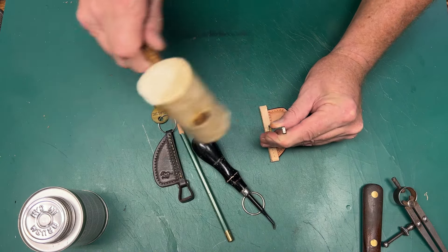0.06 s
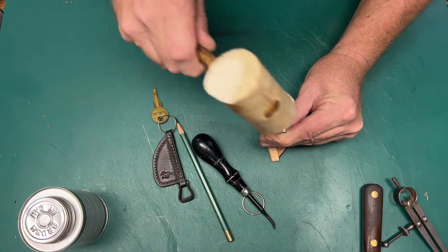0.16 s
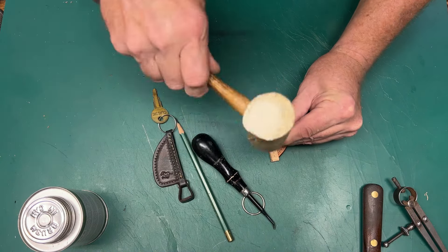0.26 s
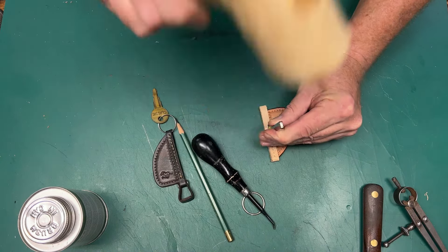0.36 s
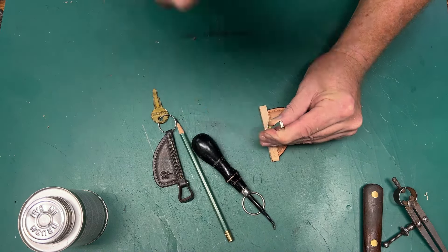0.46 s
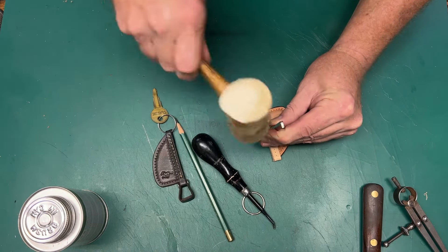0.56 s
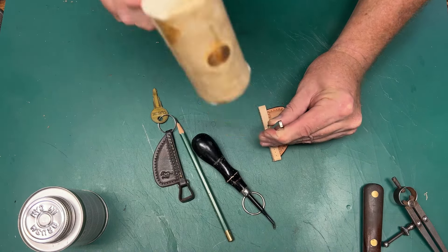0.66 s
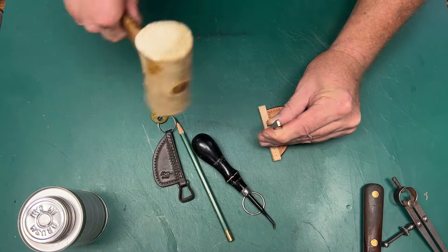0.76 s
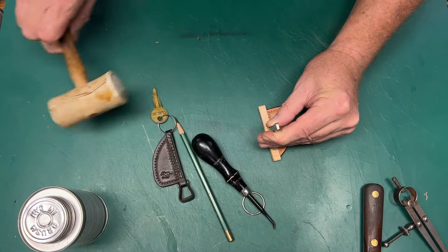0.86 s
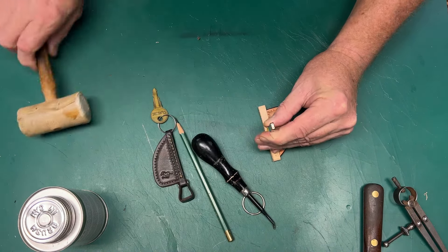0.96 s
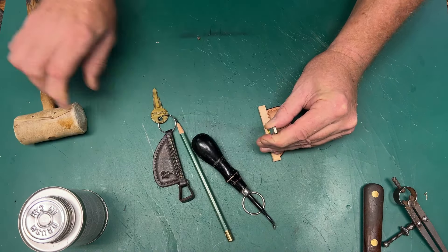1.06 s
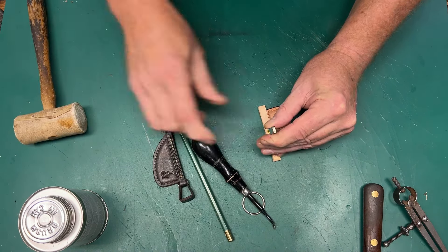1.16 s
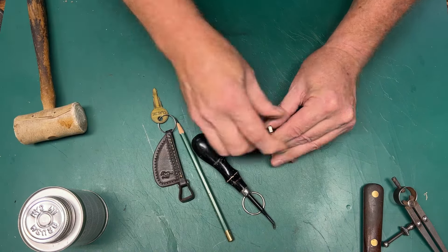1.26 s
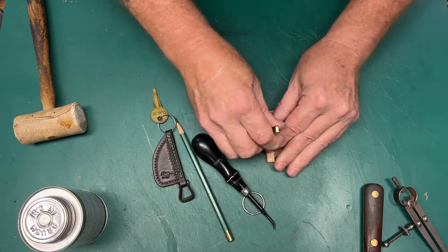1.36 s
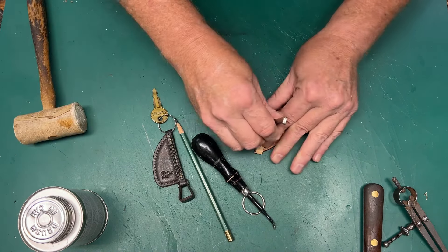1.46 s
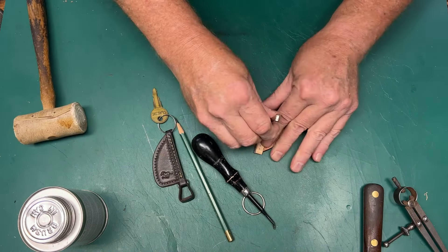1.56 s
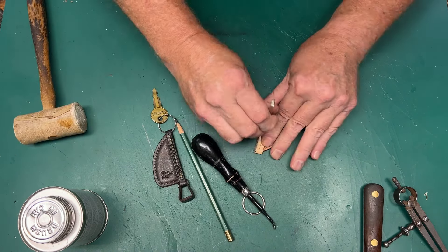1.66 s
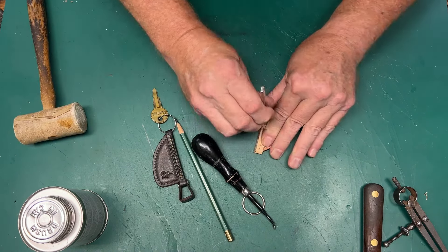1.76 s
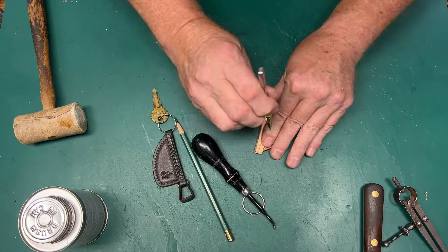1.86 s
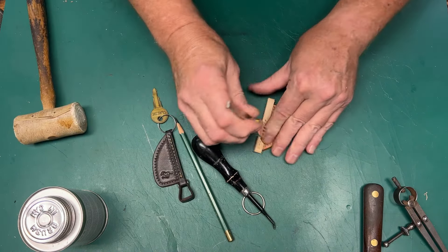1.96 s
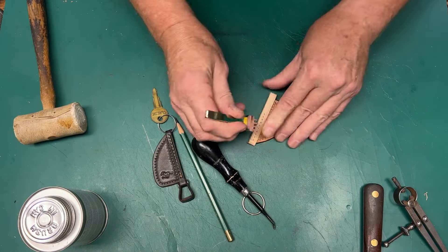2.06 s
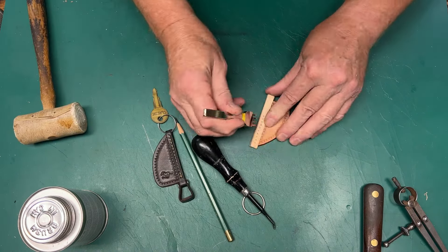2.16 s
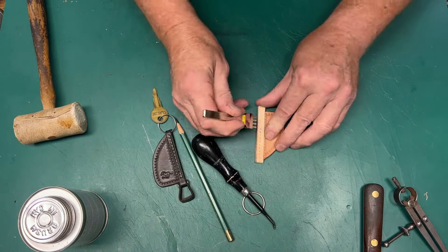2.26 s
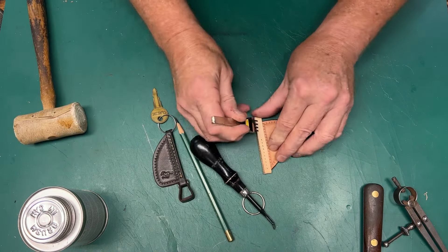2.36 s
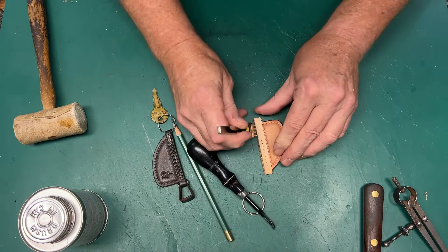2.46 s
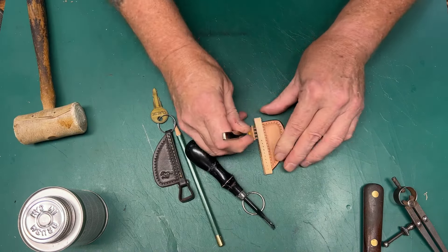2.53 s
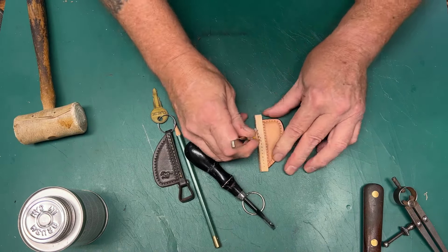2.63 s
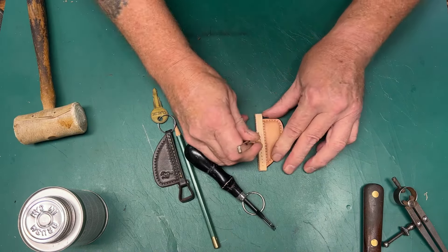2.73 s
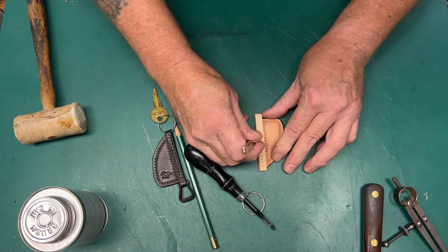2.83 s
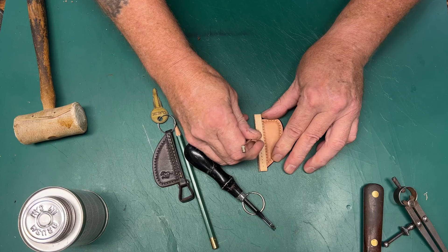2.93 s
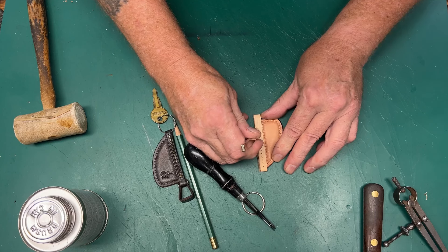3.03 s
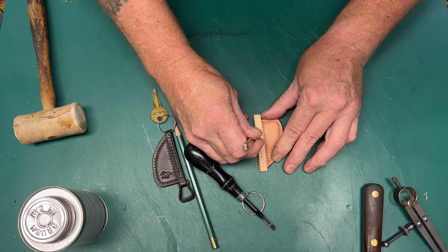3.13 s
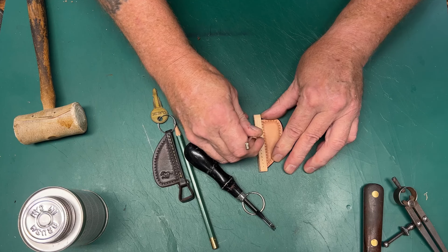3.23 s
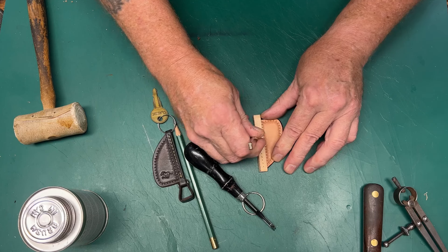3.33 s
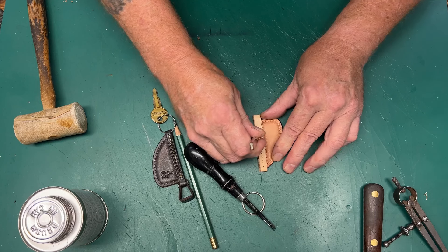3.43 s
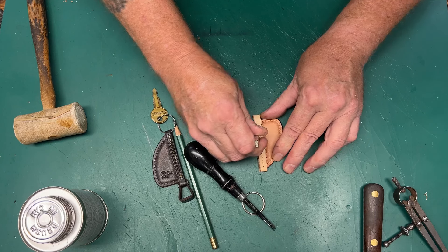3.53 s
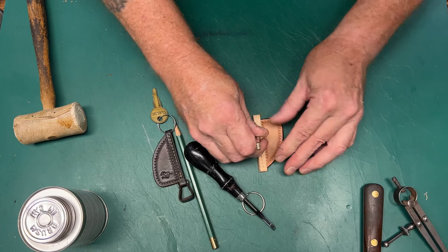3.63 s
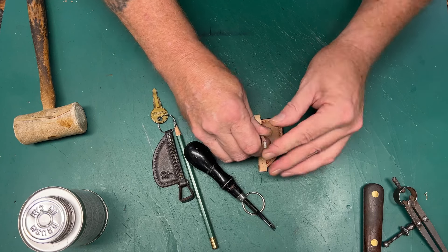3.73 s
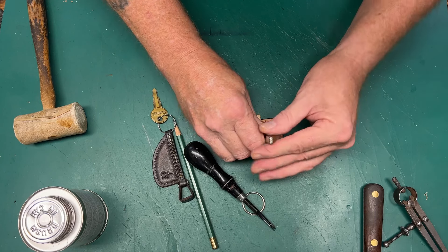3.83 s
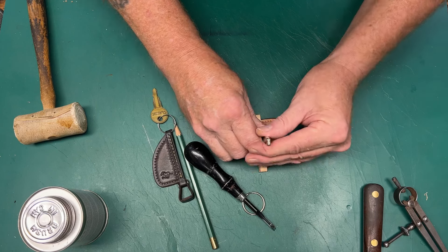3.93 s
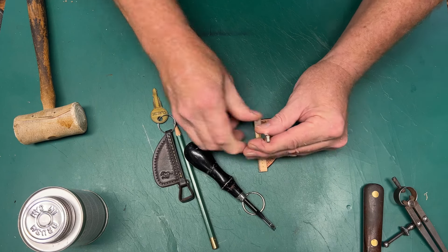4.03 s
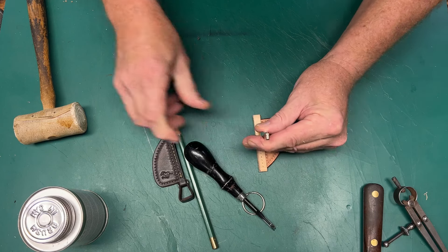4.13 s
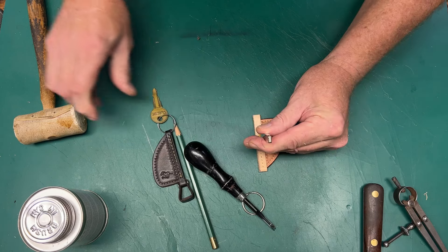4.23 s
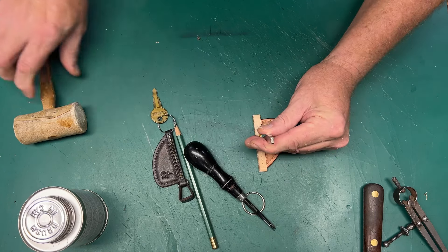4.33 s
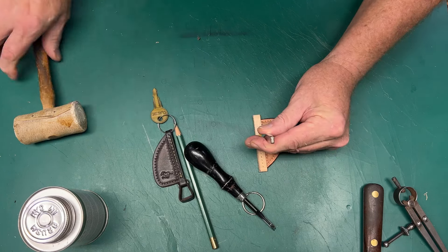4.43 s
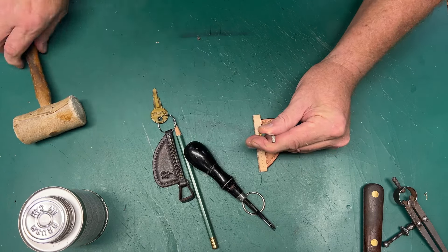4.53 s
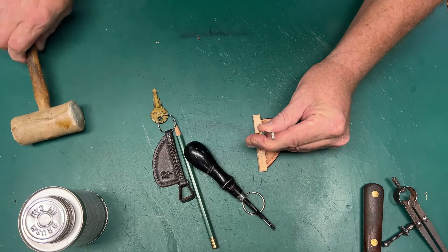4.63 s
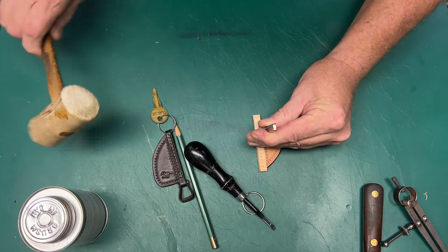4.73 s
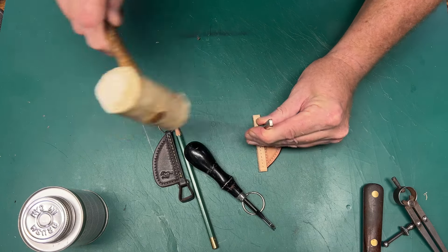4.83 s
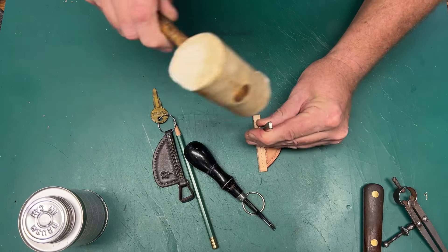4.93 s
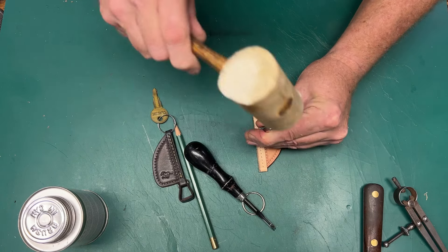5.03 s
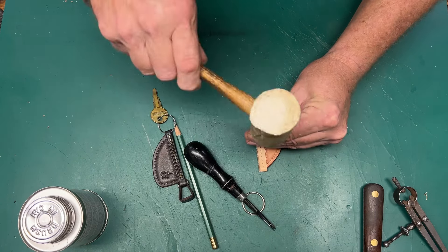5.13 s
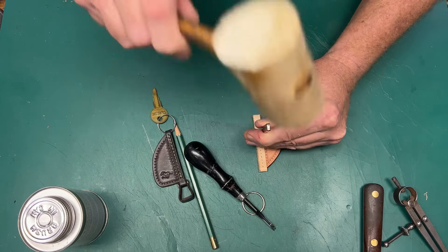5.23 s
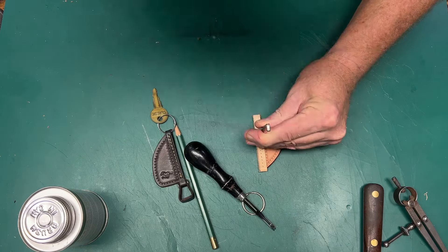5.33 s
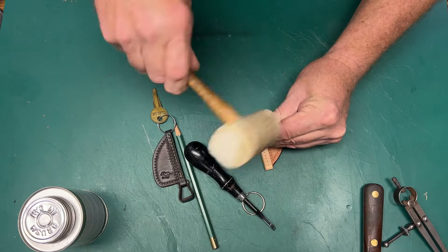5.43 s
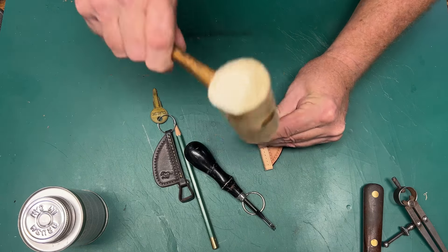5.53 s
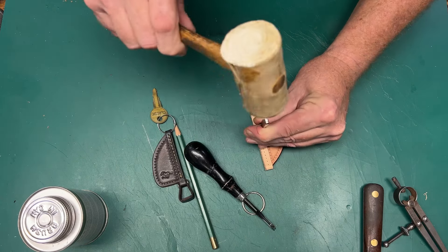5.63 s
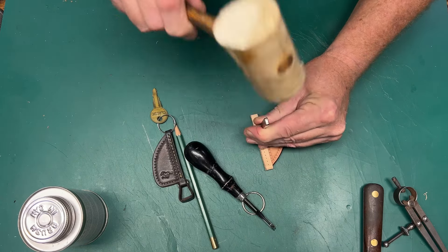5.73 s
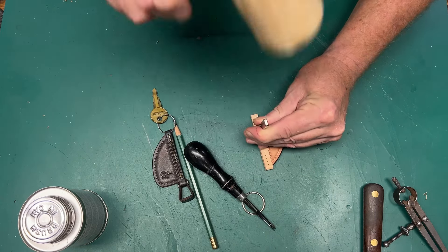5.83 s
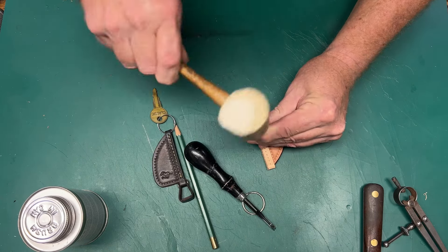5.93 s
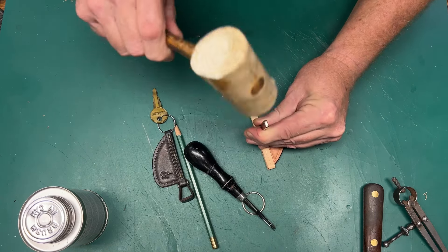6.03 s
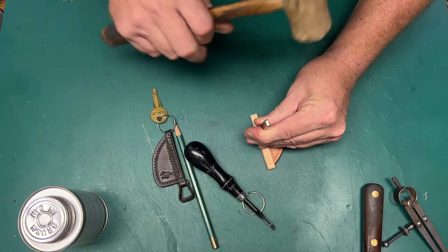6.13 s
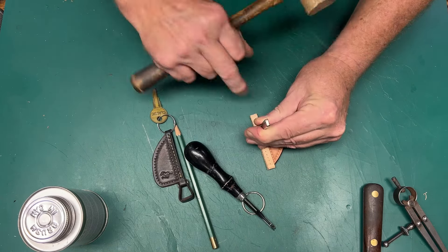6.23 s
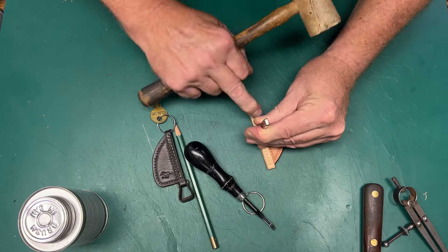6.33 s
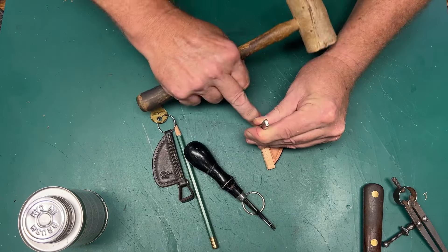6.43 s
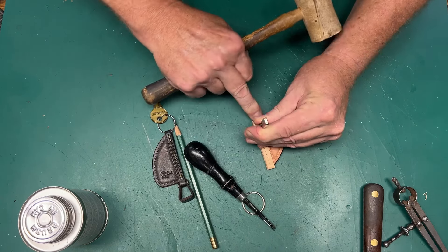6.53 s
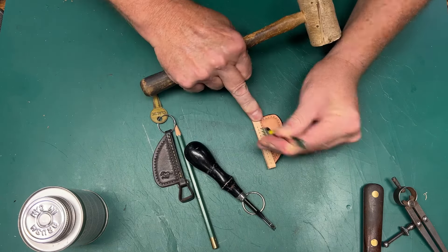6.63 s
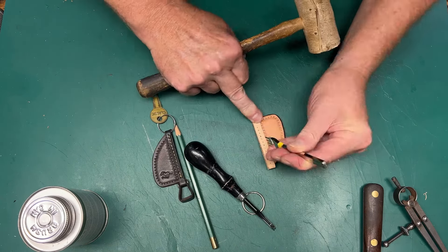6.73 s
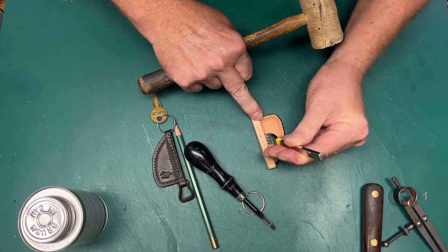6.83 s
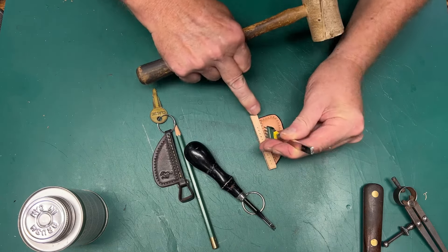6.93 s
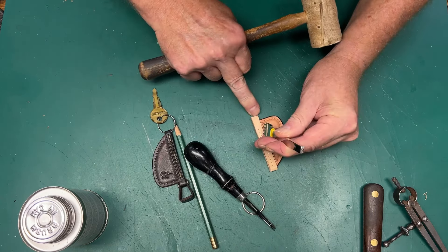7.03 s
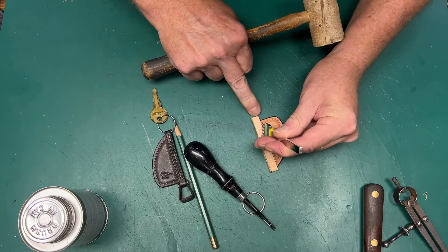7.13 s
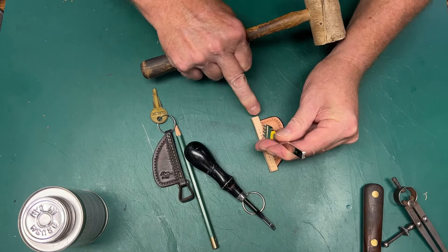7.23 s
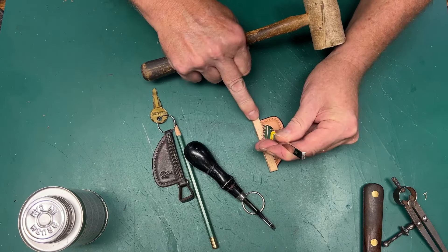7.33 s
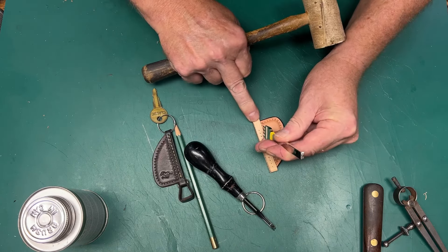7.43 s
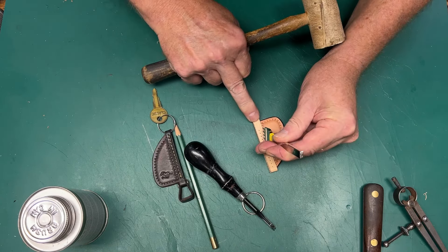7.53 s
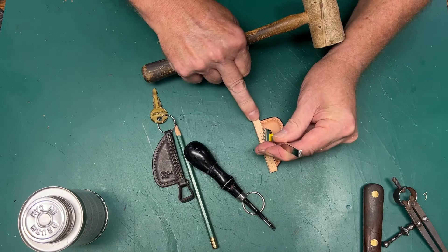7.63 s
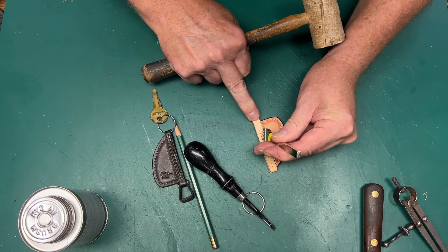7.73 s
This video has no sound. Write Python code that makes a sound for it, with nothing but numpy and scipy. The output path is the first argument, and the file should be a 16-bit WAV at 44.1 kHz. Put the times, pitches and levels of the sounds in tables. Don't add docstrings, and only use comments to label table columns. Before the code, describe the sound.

Close stereo perspective on a leatherworking bench: two woody, cracking blows with a thump of the bench top, then the mallet clatters down to the left. Quiet skin-on-leather swishes and tiny clicks fill the pause. A short scrape lifts the mallet and three blows follow, the first duller, the next two heavier. One soft hand bump and small rubs end it over faint ventilation and mains hum, with brief room reverberation.

```python
import sys
import numpy as np
from scipy import signal
from scipy.io import wavfile
from scipy.ndimage import uniform_filter1d

SR = 44100
rng = np.random.default_rng(int(sys.argv[2]) if len(sys.argv) > 2 else 0)


def linear_from_db(decibels):
    return 10 ** (np.asarray(decibels, float) / 20)


def bounce(signal):
    frames = np.transpose(np.atleast_2d(signal))
    limited = np.clip(frames, -1, 1)
    pcm = np.round(limited * 32767).astype(np.int16)
    wavfile.write(sys.argv[1], SR, pcm)


N = 343098

# frequency in Hz, level in dB per Hz.
AIR_SPECTRUM = [(15, -50), (30, -23), (50, -10), (90, -10.5), (150, -17), (240, -22.5), (360, -20.5),
                (600, -28), (1200, -36.5), (2500, -47), (4000, -58), (9000, -57.5), (17000, -68)]
# frequency in Hz, level in dB.
HUM_TONES = [(120, -59), (117.52, -65), (71.5, -66), (86, -72), (176.3, -74), (178.1, -74), (240, -76)]
# time in seconds, gain in dB.
SLOW_GAIN = [(0, 1.5), (1.001, 5), (1.5, 3.5), (4.997, 3.5), (6.298, 1.5), (7.78, 0.5)]
AIR_DB = -61.5
HUM_TOGETHER_S = 8
SHAFT_HZ, BEAT_S, LOUDEST_S = 58.12, 1.64, 3.43
SHAFT_DB, NEIGHBOUR_DB = -69.5, -65

# frequency in Hz, T60 in seconds.
ROOM_T60 = [(60, 0.21), (160, 0.64), (420, 0.44), (1100, 0.58), (2900, 0.48), (7700, 0.45), (14000, .2)]
# frequency in Hz, level in dB relative to the direct sound.
ROOM_LEVEL = [(60, -13.5), (150, -6.5), (400, -7), (1000, -1), (2500, -4.5), (6000, -3.5), (12000, -9.5)]
# frequency in Hz, left-right likeness from 0 to 1.
LIKENESS = [(60, 0.86), (180, 0.87), (550, 0.15), (1650, 0.6), (5000, 0.19)]
HANDS_ROOM_DB = -3

# middle in seconds, length in seconds, level in dB, brightness in dB.
RUBS = [(1.332, 0.22, -70.5, -5), (1.437, 0.096, -62.5, 5), (1.572, .03, -77, .1), (1.612, 0.052, -66.5, 4),
        (1.732, 0.071, -63, -3.5), (1.905, 0.074, -67, 0), (1.979, .11, -66, 2.5), (2.067, 0.067, -71, -1),
        (2.11, 0.023, -66, 8), (2.262, 0.24, -56.5, 3), (2.54, 0.11, -73, -3.5), (2.63, 0.094, -68.5, 1.5),
        (3.586, 0.051, -64, -1.1), (4.017, 0.11, -78, 13.5), (4.26, 0.022, -66.5, 1.5),
        (4.295, .09, -78, 8), (6.42, 0.046, -71, -1), (6.52, 0.076, -71, 7), (6.614, 0.048, -52, 1.5),
        (6.641, .04, -73.5, -1.5), (6.837, .05, -71.5, -2.5), (7.025, 0.049, -84, 13),
        (7.366, 0.042, -80.5, -1), (7.672, 0.085, -86.5, -2)]
# frequency in Hz, level in dB per Hz.
SKIN_SPECTRUM = [(800, -16.5), (1800, 1), (2800, 0), (4800, -0.5), (8200, -1), (12000, -2), (15500, 2.5)]
# start in seconds, level in dB, centre in Hz, top end in dB.
TICKS = [(1.279, -52, 4220, -14), (1.502, -51.5, 2400, -5), (1.5668, -57, 6490, -7),
         (1.6016, -58, 4190, -7), (1.6147, -53, 6950, -2), (1.68, -58, 2960, -14), (1.7095, -52, 2990, -9),
         (1.7349, -45, 3030, -8), (1.8144, -52, 2460, -3), (1.8829, -52.5, 2924, -5.5),
         (2.1132, -53, 4650, -2), (2.3976, -51, 2320, -35), (2.6739, -63, 2816, -16),
         (3.318, -54, 2500, -16), (3.453, -50, 2680, -12), (3.5253, -62, 2665, -11),
         (3.5663, -55, 2800, -22), (3.5862, -41.5, 2600, -7), (4.259, -42, 6200, 3),
         (4.935, -54.5, 6480, -10), (4.9777, -57, 6530, -10), (6.3989, -68, 4640, -13),
         (6.6186, -45, 3330, -3), (6.6375, -62.5, 5400, -4), (6.7094, -59, 9000, -5),
         (7.3565, -62, 4140, -12)]
TICK_PAN_DB, TICK_SCATTER_DB = 2, 2.5
# middle in seconds, length in seconds, level in dB.
DRAGS = [
    (0.035, 0.17, -76.5),
    (4.464, 0.11, -54.5),
    (4.517, 0.089, -63),
    (4.608, 0.063, -60),
    (4.641, 0.039, -69),
    (4.78, 0.23, -74),
]
# frequency in Hz, width in Hz, level in dB.
SCRAPE_MODES = [(3300, 300, 0.5), (4377, 500, -6), (5696, 320, 1.5)]
# frequency in Hz, level in dB per Hz.
MAT_SPECTRUM = [(400, -28), (1200, -2.5), (2200, -1), (3500, -4.5), (6000, -11.5), (9000, -25),
                (16000, -13)]
STROKE_ENDS_DB, STROKE_FLAT = -29, 2.5
# start in seconds, level in dB, contact time in
# seconds.
THUDS = [
    (1.0, -26.5, 0.002),
    (1.041, -27.5, 0.0054),
    (1.088, -35, 0.001),
    (4.461, -37.5, 0.0043),
    (4.504, -42, .005),
    (4.555, -45.5, 0.0051),
    (4.645, -44.5, 0.0059),
    (6.625, -24, .015),
]

# frequency in Hz, level in dB, T60 in seconds, side it swings first (signed),
# gain in dB once the iron is through.
BENCH_MODES = [(54, -17.5, 0.21, -1, -0.9), (67, -15, 0.24, -2, -3.4), (94, -13, .12, 1, 0.4),
               (103.6, -5, 0.3, -0.25, 0.06), (128.6, -4, 0.18, -0.73, -3.1), (230.3, -6, 0.13, 0.95, -7),
               (283, -3.5, 0.039, 1, -4.5), (333, -13, 0.3, 0.82, -1), (421, -5, .03, -1, 3),
               (490.5, -5.5, 0.05, -0.81, 3.5), (573, -6.5, 0.054, -0.48, 5.5),
               (756, -15, 0.067, 0.17, 0.8), (810, -20, 0.082, -1.1, 4), (920, -19.5, .03, 0.99, -0.35)]
# frequency in Hz, level in dB, T60 in seconds, gain in dB once the iron is through.
HEAD_MODES = [(1240, -11, 0.009, -4), (1510, -0.5, 0.025, 0.5), (1874, 0.1, 0.022, -5),
              (2270, -9, 0.031, -2.5)]
# frequency in Hz, level in dB, T60 in seconds.
HANDLE_MODES = [(3405, 0, .04), (3640, -2, .028), (4380, -6, .012), (5860, -7, .016), (8700, -12, .01)]
# frequency in Hz, level in dB per Hz.
SLAP_SPECTRUM = [(300, -29.5), (800, -5.5), (1600, 3.5), (2800, -10), (5000, -21), (9000, -32.5)]
# frequency in Hz, level in dB per Hz.
STEEL_SPECTRUM = [(1500, -19), (3000, 0), (6000, -3), (8500, -7.5), (11500, -4), (16000, -21.5)]
# frequency in Hz, level in dB per Hz.
WALLS_THROUGH = [(300, -37), (700, -5.5), (1100, 0.5), (1700, -1.5), (2800, -3), (5000, -14.5),
                 (9000, -23.5), (14000, -38)]
# frequency in Hz, level in dB per Hz.
WALLS_CUSHIONED = [(300, -29), (700, -5), (1100, -8.5), (2000, -3), (2350, -3), (2800, -17), (5000, -19.5),
                   (9000, -29), (14000, -45)]
# start in seconds, bench thump in dB, head crack in dB,
# steel tick in dB, handle ring in dB.
TAPS = [
    (2.545, -67, -64, -91.5, -97),
    (6.619, -50, -72, -80, -71),
    (6.851, -52.5, -62, -67.5, -91),
]
# start in seconds, bench thump in dB, head crack in dB,
# tick in dB, handle ring in dB.
LAID = [
    (0.93, -22, -33.5, -55, -61),
    (0.994, -24.5, -29.5, -56, -56),
    (.998, -25, -33.5, -40, -50.5),
    (1.027, -32, -33, -42, -46),
    (1.03, -22.5, -21.5, -22, -22.5),
    (1.085, -29, -38.5, -35, -35),
    (4.457, -42, -54.5, -76, -60),
    (4.553, -47.5, -60.5, -89.5, -76),
]
# start in seconds, bench thump in dB, head crack in dB, steel tick in dB,
# handle ring in dB.
BLOWS = [
    (0.225, -9.5, -16.5, -30.5, -45),
    (0.5233, -4.5, -12, -16.5, -40),
    (5.0961, -11, -15.5, -30, -34.5),
    (5.4273, -3, -14, -18, -45.5),
    (5.8938, -3.5, -12, -22, -41),
]
CUSHIONED_DB, THROUGH_DB = -10.5, -3.5
FIRMNESS = 0.37

# frequency in Hz, gain in dB.
MIC_RESPONSE = [(15, -32), (45, -5.5), (80, -1.43), (9300, -0.1), (9750, -7), (10150, -26), (10700, -5.5),
                (13000, -9.5), (13700, -25.5), (14500, -5), (16200, -5), (16800, -61.5)]


def read(points, hz):
    f, value = np.transpose(points)
    return np.interp(np.log(hz + 1), np.log(f + 1), value)


def evened(x):
    return x / np.sqrt(np.mean(x ** 2) + 1e-20)


def colour(x, points):
    log_gain = np.log(linear_from_db(read(points, abs(np.fft.fftfreq(8192, 1 / SR)))))
    taps = np.fft.ifft(np.exp(signal.hilbert(log_gain).conj())).real[:3000]
    taps = taps.reshape((1,) * (x.ndim - 1) + (-1,))
    return signal.oaconvolve(x, taps, axes=-1)[..., :x.shape[-1]]


def add(mix, s, sound, pan_db, lead=1):
    for channel, late, db in zip(mix, (0, lead), (pan_db / 2, -pan_db / 2)):
        part = channel[round(s * SR) + late:][:len(sound)]
        part += linear_from_db(db) * sound[:len(part)]


def diffuse(a, b, hz):
    same = np.clip(read(LIKENESS, hz), 0, 1)[:, None]
    return np.array([a, same * a + np.sqrt(1 - same ** 2) * b])


def workshop():
    frames, hz = N // 512 + 5, np.fft.rfftfreq(2048, 1 / SR)
    a, b, c, d, patches = rng.standard_normal((frames, len(hz), 5)).T
    patches = uniform_filter1d(uniform_filter1d(patches, 16, 0), 8, 1)
    level_db = read(AIR_SPECTRUM, hz)[:, None] + 0.4 * evened(patches)
    z = diffuse(a + 1j * b, c + 1j * d, hz) * linear_from_db(level_db)
    air = linear_from_db(AIR_DB) * evened(signal.istft(z, nperseg=2048, noverlap=1536)[1][:, :N])
    t = np.arange(N) / SR
    hum = sum(linear_from_db(db) * np.cos(2 * np.pi * f * (t - HUM_TOGETHER_S)) for f, db in HUM_TONES)
    swell = linear_from_db(SHAFT_DB) + 2 * linear_from_db(NEIGHBOUR_DB) * np.cos(2 * np.pi * (t - LOUDEST_S) / BEAT_S)
    shaft = swell * np.sin(2 * np.pi * SHAFT_HZ * t)
    return air + np.sqrt(2) * (linear_from_db(-3.5) * hum + shaft) * linear_from_db([[.5], [-.5]])


def room(x, first_s=0.0033, build_s=0.004):
    taps = np.zeros((2, SR))
    slots = np.arange(0, SR - 12, 12)
    at = slots + rng.integers(0, 12, (2, len(slots)))
    np.put_along_axis(taps, at, rng.choice([-1., 1.], at.shape), 1)
    hz, t, z = signal.stft(taps, SR, nperseg=512)
    t60 = read(ROOM_T60, hz)[:, None]
    decay = linear_from_db(read(ROOM_LEVEL, hz)[:, None] - 60 * t / t60) / np.sqrt(t60)
    z = diffuse(z[0], z[1], hz) * decay
    tail = signal.istft(z, SR, nperseg=512)[1][:, :SR]
    build = np.clip((np.arange(SR) / SR - first_s) / build_s, 0, 1)
    tail = tail * build * np.sqrt(12 * 6 * np.log(10) / SR)
    return signal.fftconvolve(x.mean(0)[None], tail, axes=1)[:, :N]


def friction(count, grain_db):
    unevenness = evened(uniform_filter1d(rng.standard_normal(count), 90))
    return evened(rng.standard_normal(count) * linear_from_db(grain_db * unevenness))


def stroke(middle, length, db):
    away = np.minimum(abs(np.arange(N) / SR - middle) / (length / 2), 3)
    return linear_from_db(db + STROKE_ENDS_DB * away ** STROKE_FLAT)


def rubs():
    mix, hiss = np.zeros((2, N)), evened(colour(friction(N, 1.7), SKIN_SPECTRUM))
    low = uniform_filter1d(hiss, 5)
    dull = sum(stroke(s, length, db - tilt_db) for s, length, db, tilt_db in RUBS)
    bright = sum(stroke(s, length, db + tilt_db) for s, length, db, tilt_db in RUBS)
    add(mix, 0, low * dull + (hiss - low) * bright, .8)
    return mix


def ticks():
    mix, t = np.zeros((2, N)), np.arange(1200) / SR
    for s, db, hz, top_db in TICKS:
        snap = rng.standard_normal(len(t)) * linear_from_db(-60 * t / 0.014)
        snap = colour(snap, [(hz / 5, -24), (hz * .78, -5), (hz, 0), (hz * 1.1, -6), (16000, top_db)])
        pan_db = TICK_PAN_DB + TICK_SCATTER_DB * rng.uniform(-1, 1)
        add(mix, s, linear_from_db(db) * snap / abs(snap).max(), pan_db)
    return mix


def drags():
    mix, slips = np.zeros((2, N)), friction(N, 3.5)
    sound = linear_from_db(-1.5) * evened(colour(slips, MAT_SPECTRUM))
    for hz, width, peak_db in SCRAPE_MODES:
        resonance = signal.lfilter(*signal.iirpeak(hz, hz / width, SR), slips)
        sound = sound + linear_from_db(peak_db - 7.5) * evened(resonance)
    add(mix, 0, sum(stroke(*row) for row in DRAGS) * sound, 4.5, lead=9)
    return mix


def ring(t, hz, db, t60, rise_s):
    t = np.maximum(t, 0)
    swell = 1 - np.exp(-(t / rise_s) ** 2)
    return linear_from_db(db - 60 * t / t60) * swell * np.sin(2 * np.pi * hz * t)


def thuds():
    mix, t = np.zeros((2, N)), np.arange(SR // 4) / SR
    for s, level_db, contact_s in THUDS:
        sound = sum(ring(t, hz, db, .27 * t60 + 3 * contact_s, contact_s) / (1 + (hz * contact_s) ** 3)
                    for hz, db, t60, *_ in BENCH_MODES)
        add(mix, s, linear_from_db(level_db + 6) * sound, 1.3)
    return mix


def knock(row, chance, push_s, crack_rise_s, spike, handle_far_db, pitch, travel):
    s, thump_db, crack_db, tick_db, handle_db, through = row
    t, hard = np.arange(SR // 2) / SR, np.clip(through, 0, 1)
    crack_rise_s = crack_rise_s * (1.1 - 0.58 * hard)
    bench = sum(side * ring(t - push_s, hz, db + gained * (through - .5), t60,
                            travel * 0.00074 * (500 / hz) ** 1.4)
                for hz, db, t60, side, gained in BENCH_MODES)
    head = sum(ring(t, hz * pitch * (1 + .02 * c), db + gained * (hard - .5), t60, crack_rise_s)
               for (hz, db, t60, gained), c in zip(HEAD_MODES, chance))
    handle = sum(ring(t, hz, db, t60, 0.00013) for hz, db, t60 in HANDLE_MODES)
    handle_around = sum(ring(t, hz, db, 1.2 * t60, 0.0002) for hz, db, t60 in HANDLE_MODES)
    a, b = rng.standard_normal((2, len(t)))
    contact = signal.unit_impulse(len(t), round(crack_rise_s * SR))
    steel_click = colour(contact, STEEL_SPECTRUM)
    slap = evened(colour(a, SLAP_SPECTRUM)) * linear_from_db(-60 * t / 0.025) * np.minimum(t / crack_rise_s, 1)
    tick_decay = linear_from_db(-60 * t / 0.01) + linear_from_db(-16 - 60 * t / 0.012)
    tick = evened(colour(b, STEEL_SPECTRUM)) * tick_decay * np.minimum(t / .0004, 1)
    tick = tick + spike * steel_click
    near = linear_from_db(crack_db) * (linear_from_db(8.0) * head + linear_from_db(6.0) * slap)
    near = near + linear_from_db(tick_db + 9.5) * tick + linear_from_db(handle_db + 10.0) * handle
    far = hard * colour(contact, WALLS_THROUGH) + (1 - hard) * linear_from_db(-4.5) * colour(contact, WALLS_CUSHIONED)
    far = linear_from_db(crack_db + 34) * far + linear_from_db(tick_db + 24.0 + .3 * spike) * steel_click
    far = far + linear_from_db(handle_db + 4.5 + handle_far_db) * handle_around
    return linear_from_db(thump_db + 2.0) * bench + np.array([near, far])


def mallet():
    near, far = np.zeros((2, 2, N))
    blows = [(*row, (row[1] - CUSHIONED_DB) / (THROUGH_DB - CUSHIONED_DB)) for row in BLOWS]
    laid, taps = ([(*row, FIRMNESS) for row in rows] for rows in (LAID, TAPS))
    # rows, push delay s, crack rise s, spike, handle toward walls dB, pitch, travel, pan dB, lead samples
    kinds = [(blows, .0027, .0011, .3, 5, 1, 1, .9, 1),
             (laid, .0004, .0012, 18., -12, .75, 1.7, 4.5, 9),
             (taps, .0004, .0009, .3, -3, 1, 1.3, 1.5, 1)]
    for rows, push_s, rise_s, spike, handle_far_db, pitch, travel, pan_db, lead in kinds:
        for row, chance in zip(rows, rng.uniform(-1, 1, (len(rows), 4))):
            toward, around = knock(row, chance, push_s, rise_s, spike, handle_far_db, pitch, travel)
            add(near, row[0], toward, pan_db, lead=lead)
            add(far, row[0], around, 0)
    return near, far


def scene():
    near, far = mallet()
    hands, low = ticks() + rubs() + drags(), thuds()
    walls = room(far + low + linear_from_db(HANDS_ROOM_DB) * hands)
    slow_gain = linear_from_db(np.interp(np.arange(N) / SR, *np.transpose(SLOW_GAIN)))
    return near + hands + low + walls + workshop() * slow_gain


def smear(x, smear_db, patchy_db):
    hz, t, z = signal.stft(x, SR, nperseg=1024)
    patches = np.repeat(rng.uniform(-1.7, 1.7, (2, 33, len(t))), 16, axis=1)[:, :513]
    bass_db = read([(300, -20), (900, 0)], hz)[:, None]
    z = abs(z) * linear_from_db(smear_db + bass_db + patchy_db * patches) * np.exp(2j * np.pi * rng.random(z.shape))
    return x + signal.istft(z, nperseg=1024)[1][:, :N]


def top_cut(x):
    return signal.sosfilt(signal.butter(12, 17100, fs=SR, output="sos"), x)


def record(dry):
    left, right = colour(dry, MIC_RESPONSE)
    low = uniform_filter1d(right, size=3)
    x = np.array([left, right - low + np.roll(low, 1)])
    mix = smear(0.9 * np.tanh(x / 0.96), -19.5, 11.0)
    return top_cut(mix)


dry = scene()
out = record(dry)
bounce(out)
```